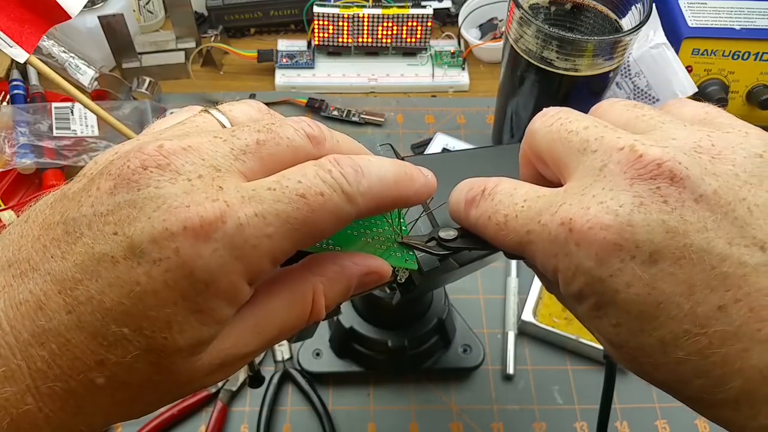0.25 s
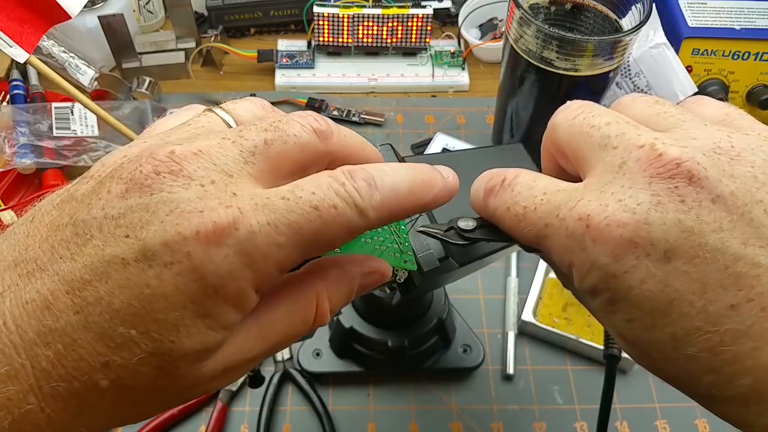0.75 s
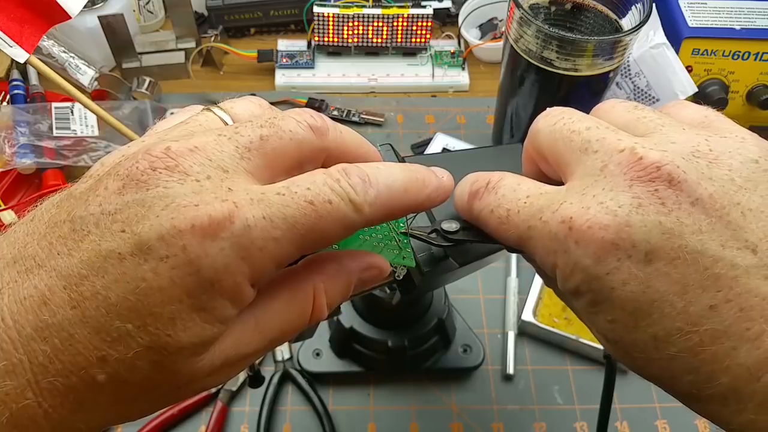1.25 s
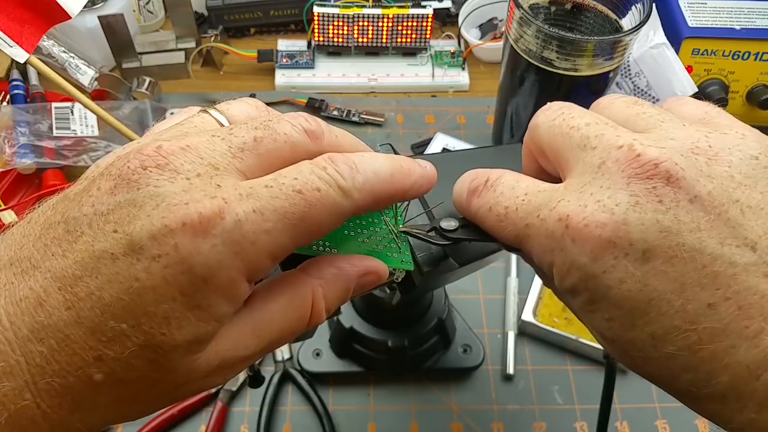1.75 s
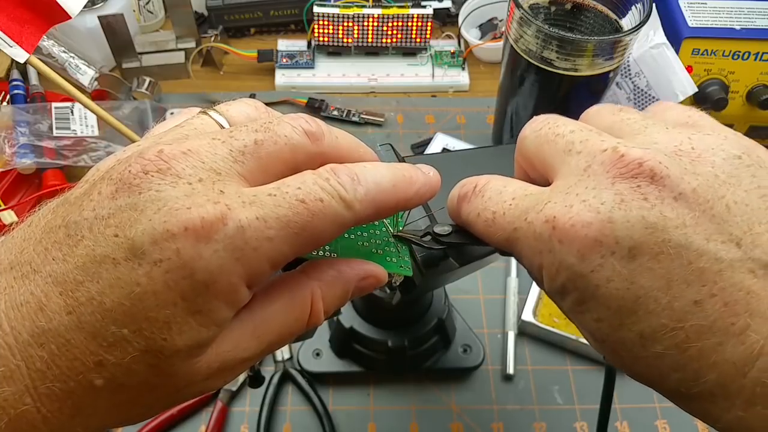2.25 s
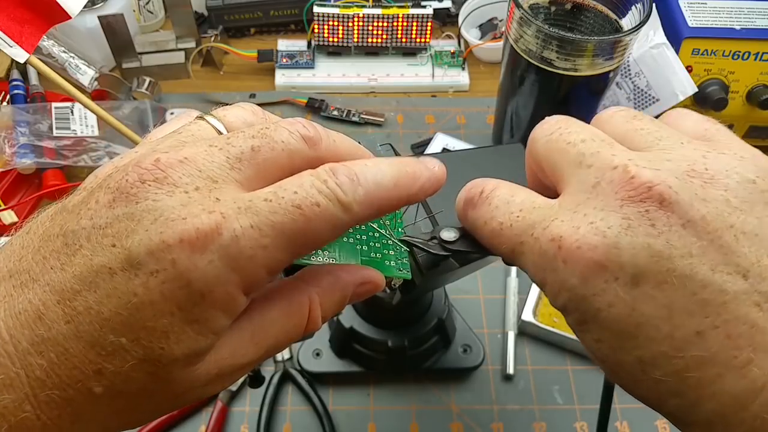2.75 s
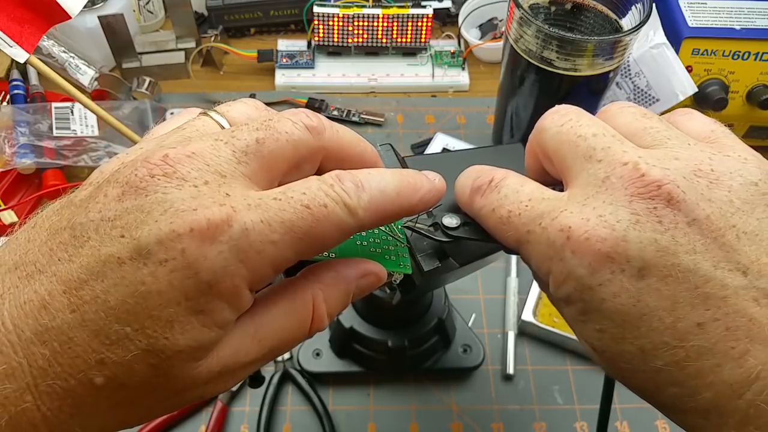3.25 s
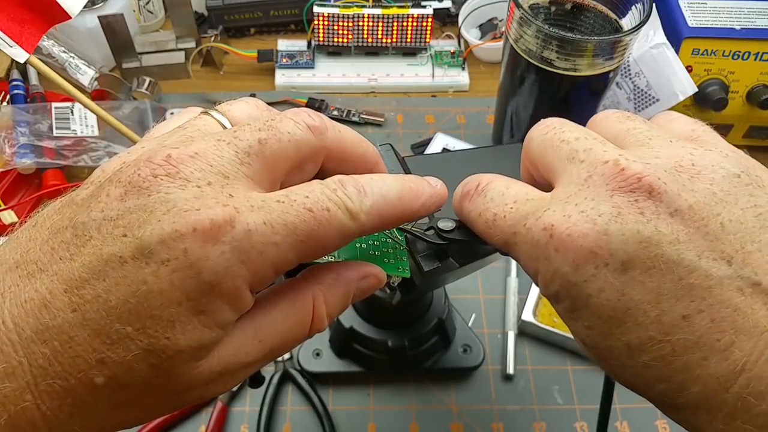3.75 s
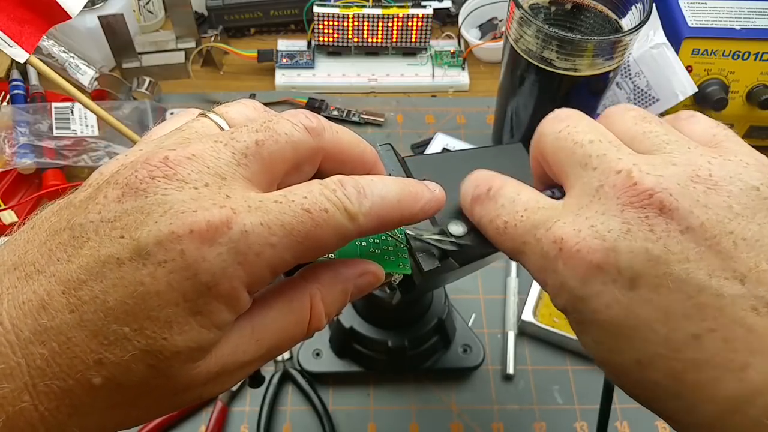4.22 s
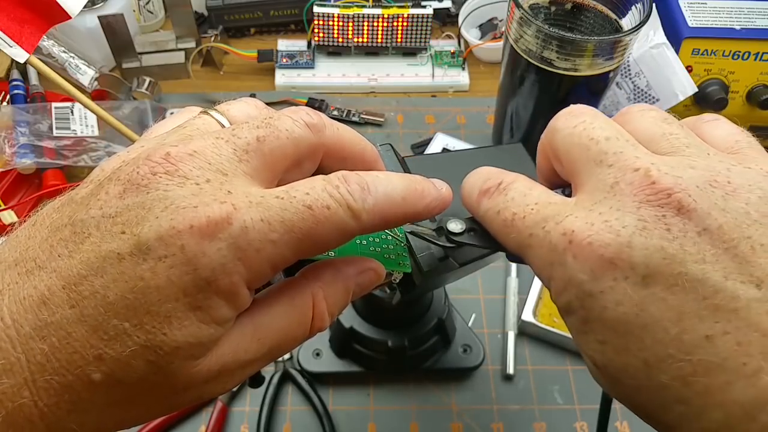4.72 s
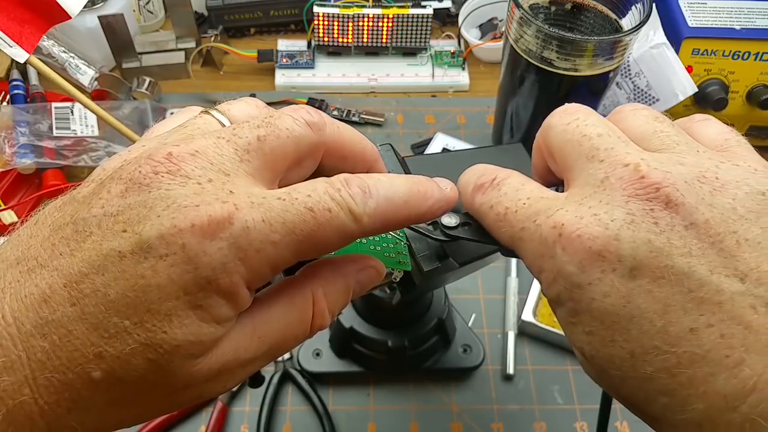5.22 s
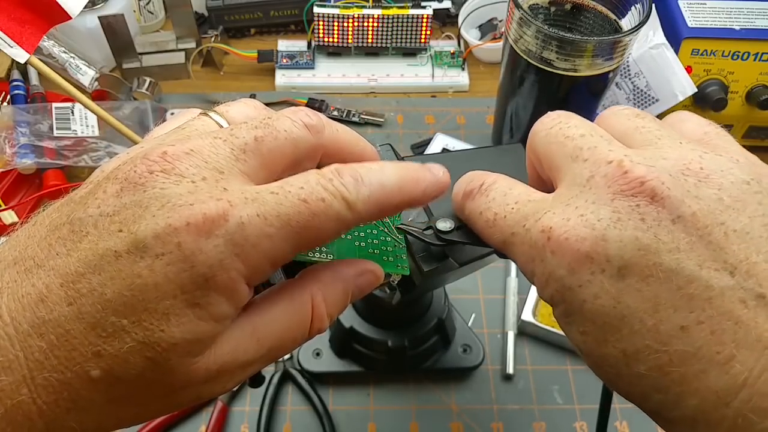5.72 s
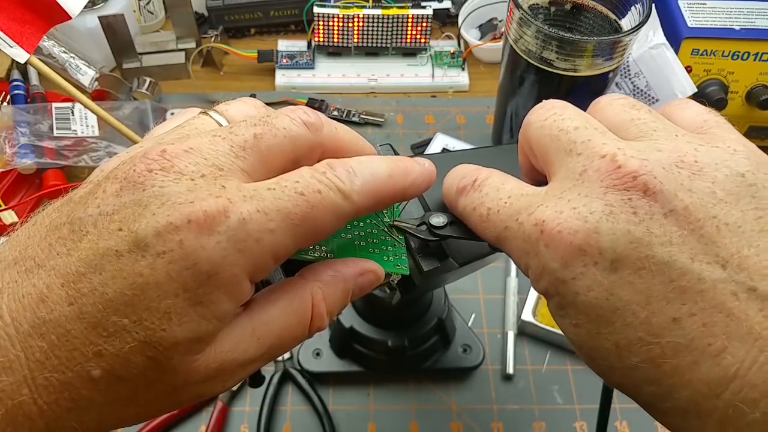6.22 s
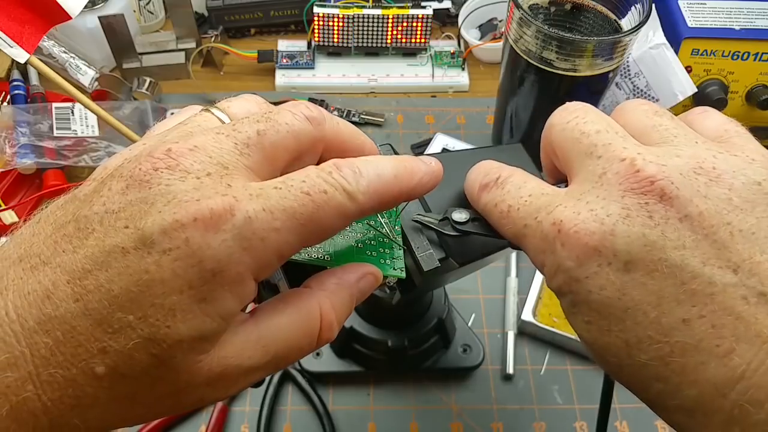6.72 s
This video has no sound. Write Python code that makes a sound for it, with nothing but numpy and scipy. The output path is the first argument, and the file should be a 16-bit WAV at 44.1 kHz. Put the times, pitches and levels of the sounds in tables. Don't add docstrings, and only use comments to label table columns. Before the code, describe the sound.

Very close stereo microphones at a workbench in a small room. Steel cutter jaws tick and drag on wire leads, tapping a circuit board held in a vise. Five sharp, bright snips stand far above everything else, each with a metallic clatter, a brief board ring and a short room answer. A longer stretch of light fiddling separates the third and fourth. Low ventilation rumble and faint hiss continue throughout.

```python
import sys
import numpy as np
from scipy import signal
from scipy.fft import rfft, irfft, next_fast_len
from scipy.io import wavfile
from scipy.ndimage import uniform_filter1d, map_coordinates

SR = 44100
rng = np.random.default_rng(int(sys.argv[2]) if len(sys.argv) > 2 else 0)


def gain_from_db(level_db):
    decades = np.asarray(level_db, float) / 20
    return 10 ** decades


def log_audio(samples):
    frames = np.atleast_2d(samples).T
    limited = np.clip(frames, -1, 1)
    pcm = np.round(limited * 32767).astype(np.int16)
    wavfile.write(sys.argv[1], SR, pcm)


N = 307818
HISS_TOP_HZ = 15850


def unit(x):
    return x / np.sqrt(np.mean(x ** 2) + 1e-20)


def along(points, hz):
    f, v = np.transpose(points)
    return np.interp(np.log(hz + 1), np.log(f + 1), v)


def tinted(x, gain):
    m = next_fast_len(x.shape[-1] + 4096)
    spectrum = rfft(x, m) * gain(np.fft.rfftfreq(m, 1 / SR))
    return irfft(spectrum, m)[..., :x.shape[-1]]


def bump(hz, centre, width):
    return 1 / (1 + ((hz - centre) / width) ** 2)


def sides(pan_db):
    return gain_from_db(np.array([[.5], [-.5]]) * pan_db)


def add(out, s, sound):
    at = round(s * SR)
    out[:, at:at + sound.shape[-1]] += sound


def ring(modes, t, scatter_db, rise=0.000076):
    total = 0
    for hz, db, t60 in modes:
        strength_db = db + scatter_db * rng.normal()
        total = total + gain_from_db(strength_db - 60 * t / t60) * np.sin(2 * np.pi * hz * t)
    return total * (1 - np.exp(-t / rise))


def pair(size, alike):
    def mid_and_side(hz):
        turn = np.arccos(np.clip(along(alike, hz), -1, 1)) / 2
        return np.array([np.cos(turn), np.sin(turn)])
    mid, side = tinted(rng.standard_normal((2, size)), mid_and_side)
    return np.array([mid + side, mid - side])


def patchy(x, depth_db, size, bins, frames):
    z = signal.stft(x, nperseg=size)[2]
    patches = uniform_filter1d(rng.standard_normal(z.shape[1:]), bins, axis=0)
    patches = unit(uniform_filter1d(patches, frames, axis=1))
    return unit(signal.istft(z * gain_from_db(depth_db * patches), nperseg=size)[1][:, :x.shape[-1]])


# pitch in Hz, half width in Hz, boost in dB.
DUCT_BOOMS = [(40, 9, 6.5), (102, 5, 3), (129, 2.2, 1.5), (143, 7, 3.5), (244, 7, 3), (456, 22, 2.5),
              (790, 20, 5)]
def duct_db(hz):
    return sum(db * bump(hz, centre, width) for centre, width, db in DUCT_BOOMS)


# time in seconds, level in dB.
VENT_LEVEL = [(0.0, -51), (0.21, -52), (0.52, -57), (0.58, -53), (0.6, -50), (0.91, -54), (1.05, -50),
              (1.11, -53), (4.78, -51.5), (4.92, -55), (4.96, -50.5), (5.27, -51.5), (6.9, -51.5),
              (6.98, -55.5)]
# pitch in Hz, level in dB per Hz.
VENT_COLOUR = [(11, -38.5), (18, -7.5), (38, -8.5), (59, -6), (99, 0), (151, -6), (174, -15.5),
               (200, -17.5), (238, -8.5), (269, -12.5), (327, -11.5), (564, -24), (626, -21.5), (1120, -41),
               (1200, -26), (1560, -60.5), (2640, -120)]
# pitch in Hz, likeness from 0 to 1.
VENT_LIKENESS = [(35, .993), (120, .98), (180, .75), (280, .8), (420, .52), (600, .42), (900, 0),
                 (15000, 0)]
def ventilation(now):
    rumble = unit(tinted(pair(N, VENT_LIKENESS), lambda hz: gain_from_db(along(VENT_COLOUR, hz) + duct_db(hz))))
    rumble = patchy(rumble, 1.5, 2048, 6, 5)
    sway = map_coordinates(rng.standard_normal(200), [now * 4])
    return gain_from_db(np.interp(now, *np.transpose(VENT_LEVEL)) + 0.3 * sway) * rumble


# pitch in Hz, level in dB per Hz.
HISS_COLOUR = [(410, -23.5), (700, -3.5), (841, -5.5), (1120, -4.5), (1300, -9.5), (1420, -4.5),
               (1710, -10.5), (2000, -8), (3740, -15.5), (4920, -8), (7890, -22.5), (15200, -18.5),
               (16000, -29)]
# pitch in Hz, width in Hz, dB over the hiss.
SUPPLY_WHINE = (11350, 200, 4)
def microphone_hiss():
    whine_hz, width_hz, whine_db = SUPPLY_WHINE
    def colour(hz):
        level_db = along(HISS_COLOUR, hz) + whine_db * bump(hz, whine_hz, width_hz) + duct_db(hz)
        return gain_from_db(level_db) * (hz < HISS_TOP_HZ)
    return gain_from_db(-65.5) * unit(tinted(rng.standard_normal((2, N)), colour))


# middle in seconds, level in dB, length in seconds.
GRIP_MOVES = [
    (0.715, -68.5, 0.074),
    (1.548, -75.5, 0.34),
    (2.414, -71, 0.04),
    (4.286, -79, 0.3),
    (5.702, -69, 0.18),
    (6.092, -68.5, 0.18),
]
def hands(now):
    moving = gain_from_db(-82)
    for s, db, length in GRIP_MOVES:
        moving = moving + gain_from_db(db) * np.exp(-((now - s) / length) ** 2)
    flutter = map_coordinates(rng.standard_normal(200), [now * 24])
    rustle = unit(tinted(pair(N, [(500, 0.45), (1500, 0.0029)]), lambda hz: bump(hz, 900, 600)))
    return moving * gain_from_db(2.5 * flutter) * rustle


# pitch in Hz, level in dB per Hz.
ECHO_COLOUR = [(290, -27.5), (500, -3), (651, -9), (1640, -7), (2040, 0), (2390, -3), (4970, -6),
               (14300, -13.5), (15800, -12), (16500, -38.5)]
# pitch in Hz, time to fall 60 dB in seconds.
ROOM_DECAY = [(500, 0.13), (2000, 0.14), (7000, .17), (14000, 0.14)]
def reverb(size):
    noise = pair(size, [(300, 0.8), (1400, 0.65), (3000, .05)])
    noise = tinted(noise, lambda hz: gain_from_db(along(ECHO_COLOUR, hz)) * (hz < HISS_TOP_HZ))
    noise = patchy(patchy(noise, 3, 512, 2, 7), 2.5, 128, 5, 3)
    hz, t, z = signal.stft(noise, SR, nperseg=128)
    fading = z * gain_from_db(-60 * t / along(ROOM_DECAY, hz)[:, None])
    return signal.istft(fading, SR, nperseg=128)[1][:, :size]


# pitch in Hz, boost in dB.
JAW_RINGS = [(2850, 3), (3200, 9), (3680, 2.5), (4350, 5), (4850, 7), (5500, 3.5), (7000, 6)]
def grate(t, centre_hz, top_db, rise, t60, pan_db):
    grit = rng.standard_normal((2, len(t))) * gain_from_db(4.9 * rng.standard_normal(len(t)))

    def shelf(hz):
        return 0.74 * hz ** 2 / (hz ** 2 + 1500 ** 2) / (1 + (hz / HISS_TOP_HZ) ** 20)

    def bright(hz):
        return 1 / (1 + (7000 / (hz + 1)) ** 6)

    def jaw_colour(hz):
        steel = gain_from_db(sum(db * bump(hz, mode_hz, 90) for mode_hz, db in JAW_RINGS) - 3.5)
        peak = np.exp(-np.log((hz + 1) / centre_hz) ** 2 / 0.036)
        return steel * (shelf(hz) * (1 - bright(hz)) + peak)

    hump = tinted(grit, jaw_colour)
    edge = gain_from_db(top_db + 1.5) * tinted(grit, lambda hz: shelf(hz) * bright(hz))
    edge_fade = gain_from_db(-60 * t / t60 * (1 / 0.55 - 1))
    burst = (hump + edge * edge_fade) / np.std(hump + edge)
    shape = gain_from_db(-60 * t / t60) * (1 - np.exp(-t / rise))
    return sides(pan_db) * burst * shape / shape.max() + gain_from_db(top_db / 2 - 9.0) * reverb(len(t))


# start in seconds, level in dB, centre pitch in Hz,
# top octave in dB, left over right in dB.
LEAD_TICKS = [(0.0364, -43.5, 4300, -2, 3), (0.1693, -37, 3680, -8, -11.5), (0.1967, -41, 3700, -2.5, 3),
              (0.2718, -50.5, 3470, -2, 3), (0.319, -48.5, 3400, -18, -3), (0.6666, -53, 3310, 8, -9),
              (1.0513, -46.5, 2820, -48, 0), (1.7833, -51.5, 5270, -9, 0), (2.192, -53, 2560, 1, 1),
              (2.5721, -53, 2660, -14, -4), (2.6194, -58, 2940, -4, 0.5), (2.8596, -39.5, 2710, -8, -1),
              (2.8812, -45, 2850, 10, -0.5), (3.062, -35.5, 4500, -5.5, 4), (4.2337, -49, 2518, -14, -2),
              (4.341, -42.5, 3180, 12, -2), (4.6313, -32.5, 3720, -11, -3), (4.704, -50, 4800, -7, 0),
              (4.7407, -49.5, 3700, -8, -1), (4.778, -48.5, 4760, -6.5, -1), (5.8329, -42.5, 2880, -30, 5),
              (6.1516, -30.5, 4750, -11.5, -4.5), (6.657, -51, 4800, -6, 1), (5.87, -54.5, 1900, -25, 0),
              (2.925, -56, 12500, 5, -2), (3.135, -52, 9500, 7, 0), (3.175, -59, 9500, 0, 0),
              (4.726, -52, 5000, -6.5, 0)]
# start in seconds, level in dB, centre pitch in Hz,
# top octave in dB, time to fall 60 dB in seconds.
LEAD_DRAGS = [(0.0392, -28.5, 3750, -8, 0.021), (0.287, -54, 3080, 2, .03),
              (3.0655, -32.5, 6000, -10, 0.029), (3.124, -52, 4240, -2, 0.077),
              (4.246, -52, 3000, -15, .03), (4.358, -44.5, 3300, -2, 0.027), (4.634, -32.5, 5350, -4, .04),
              (5.012, -51.5, 3120, -5, 0.057), (5.839, -43.5, 2880, -33.5, 0.042),
              (6.161, -38, 4700, -23, 0.035), (6.237, -43, 2620, -5, 0.1), (6.2462, -35, 5130, -1, 0.038)]
def scrapes():
    out, t = np.zeros((2, N + SR)), np.arange(SR // 6) / SR
    for s, db, centre_hz, top_db, pan_db in LEAD_TICKS:
        add(out, s, gain_from_db(db - 6) * grate(t, centre_hz, top_db, rise=.0003, t60=0.022, pan_db=pan_db))
    for s, db, centre_hz, top_db, t60 in LEAD_DRAGS:
        add(out, s, gain_from_db(db - 9.5) * grate(t, centre_hz, top_db, rise=0.12 * t60, t60=t60, pan_db=-6.0))
    return tinted(out[:, :N], lambda hz: 1 / (1 + (hz / HISS_TOP_HZ) ** 40))


# start in seconds, level in dB, pitch in Hz,
# time to fall 60 dB in seconds.
OFFCUT_PINGS = [(.11, -68, 14500, .04), (.583, -57, 5070, .14), (1.008, -61, 2880, .07),
                (1.051, -50, 2850, .05), (1.05, -53, 2450, .03), (1.051, -58, 4350, .03),
                (5.838, -56, 2850, .04), (6.319, -60, 2900, .03), (1.3, -59, 660, .3),
                (1.345, -60, 650, .2), (2.255, -63, 1300, .12), (2.72, -52, 10500, .12),
                (2.832, -48, 840, .12), (2.834, -68, 14800, .05), (2.911, -62, 5250, .08),
                (2.911, -69, 14800, .07), (3.885, -59, 7200, .05), (5.02, -57, 1360, .07),
                (5.70, -59, 14750, .1), (.712, -66, 5400, .06), (.73, -65, 5400, .05),
                (4.277, -58, 2880, .05), (4.244, -60, 1850, .1), (6.213, -53, 1330, .06),
                (6.249, -54, 10000, .04), (6.249, -41, 4800, .06)]
def pings():
    out, t = np.zeros((2, N + SR)), np.arange(SR // 6) / SR
    for s, db, hz, t60 in OFFCUT_PINGS:
        waver = gain_from_db(3 * unit(uniform_filter1d(rng.standard_normal(len(t)), 200)))
        tone = ring([(hz, db, t60), (hz + 45, db - 9, t60)], t, 0, rise=.003)
        add(out, s, sides(-1.5) * waver * tone)
    return out[:, :N]


# pitch in Hz, level in dB, time to fall 60 dB in seconds.
BOARD_HIGH_TONES = [(1837, 0, 0.02), (1960, -2, 0.025), (2190, -13, 0.03), (2530, -9, 0.016),
                    (2880, -6, 0.03), (4350, -15, 0.021)]
def touch(t, db, hz, upper_db):
    low = ring([(hz, 0, .034), (hz * .86, -5, .034), (hz, -8, .03)], t, 0.54, rise=0.00079)
    body = low + gain_from_db(upper_db - 0.5) * ring(BOARD_HIGH_TONES, t, 2.3, rise=0.00013)
    scuff = unit(tinted(pair(len(t), [(1500, 0.24), (3000, .2)]), lambda f: bump(f, 1600, 800)))
    direct = sides(-3.5) * (body + gain_from_db(-11.5 - 60 * t / 0.054) * scuff)
    return gain_from_db(db) * (direct + gain_from_db(-26.5) * reverb(len(t)))


# start in seconds, level in dB, pitch in Hz, higher tones in dB.
BOARD_TAPS = [(0.2438, -55.5, 1360, -0.5), (0.288, -59.5, 1370, -3), (0.32, -57.5, 1320, -5),
              (0.37, -61.5, 1400, 4), (1.0085, -57, 1180, -6), (1.0502, -40, 1390, -13),
              (1.938, -64, 1390, 1), (2.247, -57, 1450, -5), (2.4575, -55, 1382, -1.5),
              (2.4694, -54, 1333, 1.5), (2.525, -51.5, 1410, -3.5), (2.8596, -45.5, 1390, -6),
              (2.8877, -53, 1370, -1), (3.73, -51.5, 1440, -15.5), (4.111, -51, 1254, -13),
              (4.2325, -61, 1190, 9), (4.2785, -48.5, 1400, -14), (4.341, -35, 1415, -11.5),
              (4.3624, -48, 1230, -18), (4.7437, -57, 1240, -9), (5.016, -53, 1360, -21.5),
              (5.395, -58, 1150, -4), (5.5464, -53.5, 1406, -11), (5.585, -50, 1370, -12),
              (5.7339, -59, 1250, -19), (5.8356, -45, 1433, -9), (5.842, -44, 1400, -9),
              (6.0333, -55.5, 1240, -11.5), (6.3185, -53.5, 1424, -4), (6.639, -56.5, 1380, -4),
              (.667, -60, 950, 0), (.733, -59, 1250, -1), (1.173, -64, 1250, 2), (5.425, -61.5, 1310, -7.5),
              (5.786, -60, 1150, -15), (6.023, -63, 1210, -8), (6.206, -55, 1250, -1),
              (1.002, -63, 1400, -2), (1.288, -68, 1290, -15)]
def taps():
    out, t = np.zeros((2, N + SR)), np.arange(SR // 6) / SR
    for s, db, hz, upper_db in BOARD_TAPS:
        add(out, s, touch(t, db, hz, upper_db))
    return out[:, :N]


# pitch in Hz, level in dB, time to fall 60 dB in seconds.
VISE_TONES = [(200.8, -6.5, 0.015), (255.6, -2, 0.15), (331.6, -0.5, 0.17), (403, -0.5, 0.13),
              (453, 7, .07)]
def vise(t, scatter_db, **onset):
    return ring(VISE_TONES, t, scatter_db, **onset)


# start in seconds, level in dB.
VISE_THUDS = [(.3694, -58.5), (0.6357, -63), (1.051, -61), (2.391, -61), (2.4586, -50.5), (2.5256, -51),
              (2.5698, -54.5), (2.8588, -55.5), (3.7293, -61), (4.111, -58.5), (4.341, -47.5), (5.017, -61),
              (5.835, -58.5), (6.552, -55)]
def thuds():
    out, t = np.zeros((2, N + SR)), np.arange(SR // 6) / SR
    for s, db in VISE_THUDS:
        add(out, s, gain_from_db(db) * sides(-2.2) * vise(t, 2.8, rise=0.0015))
    return out[:, :N]


def snap_pulse(t, lead):
    u = (t - lead - np.array([[0], [.00005]])) / .000032
    pull = np.array([[.5], [.85]]) * np.exp(-((u + 2.8) / 1.9) ** 2)
    push = 1.35 * np.exp(-u ** 2)
    recoil = .35 * np.exp(-((u - 2.6) / 1.5) ** 2)
    return tinted(push - pull - recoil, lambda hz: hz ** 2 / (hz ** 2 + 1100 ** 2))


# pitch in Hz, level in dB per Hz.
CLATTER_COLOUR = [(290, -41), (500, -18), (834, -16), (1240, -12), (1650, -8), (1980, -0.5), (2600, -5),
                  (3600, -6), (5040, -5.5), (5510, -5.5), (7270, -2), (9060, -4), (12900, -6.5),
                  (15600, -7.5), (16600, -26)]
def jaw_clatter(after, peaks, tilt_db):
    def colour(hz):
        sings = sum((12 + db) * 0.6 * bump(hz, mode_hz, width / 2) for mode_hz, width, db in peaks)
        return gain_from_db(along(CLATTER_COLOUR, hz) + sings + tilt_db * np.log2((hz + 1) / 4000))
    size = len(after)
    knocks = gain_from_db(4 * rng.standard_normal(size))
    noise = pair(size, [(1200, 0.85), (2200, 0.7), (3500, 0.4), (6000, 0.028)])
    noise = unit(tinted(noise * knocks, colour))
    t = np.arange(size) / SR
    fade = gain_from_db(-60 * t / 0.029) + 0.8 * gain_from_db(-60 * after / 0.006)
    return noise * fade * (1 - np.exp(-after / 0.00022))


# time in seconds, snap level in dB.
CUTS = [
    (.54081, -5.5),
    (1.48400, -8.5),
    (2.69238, -2),
    (5.63634, -8),
    (6.44942, -5.5),
]
# jaw clatter in dB, brightness in dB per octave, low board tone in dB,
# higher board tones in dB, left over right in dB.
CUT_AFTERMATH = [
    (-15, -1.5, -23, -29, -3),
    (-16.5, -0.7, -30.5, -33, -2.5),
    (-12, -2, -31, -27, 0),
    (-17, 0, -27, -29, -4),
    (-14.5, -1.6, -23.5, -25.5, -0.5),
]
# pitch in Hz, width in Hz, level in dB.
CUT_TONES = [
    [(2090, 97, -6), (4960, 420, -5.5), (5940, 470, -5.5), (7290, 310, -0.5), (7750, 190, -8),
     (8780, 190, -10), (9730, 250, -2), (10400, 140, -11), (11400, 170, -11), (12500, 380, -6.5),
     (14600, 430, -17), (15300, 200, -17)],
    [(2050, 170, -2.5), (3360, 270, -15), (5070, 350, -11), (5850, 220, 0), (6800, 250, -1),
     (7400, 230, -3), (9900, 260, 1), (10700, 540, -5), (11500, 140, -8), (12300, 190, -11.5),
     (14100, 210, -4), (15200, 420, -3)],
    [(1945, 123, 4.5), (3280, 100, -14), (3750, 95, -17), (4730, 450, -3), (5870, 210, -7.5),
     (7030, 250, -7.5), (7500, 440, -15), (8020, 340, -14), (9800, 340, -4.5), (11600, 400, -8),
     (14500, 220, -10), (14960, 160, -16)],
    [(1810, 260, -3), (3200, 330, 2), (4580, 240, -4), (5080, 200, -6), (6350, 550, -3), (7400, 250, 1),
     (9440, 170, -18), (10300, 280, -10.5), (12100, 240, -12.5), (12800, 190, -13), (14000, 240, -13),
     (15000, 350, -12)],
    [(3080, 640, -5.5), (5100, 230, 3.5), (5430, 220, -8), (6370, 170, -4.5), (6830, 200, -6),
     (9400, 380, -14.5), (10210, 310, -5), (10850, 450, -11.5), (12000, 210, -9), (13600, 230, -5),
     (14360, 210, -10), (14900, 180, -8)],
]
# pitch in Hz, level in dB, time to fall 60 dB in seconds.
ARM_THUMPS = [
    (350, -34.5, .03),
    (290, -33.5, 0.034),
    (451, -35.5, 0.027),
    (284, -36.5, .04),
    (434, -37.5, 0.066),
]
# pitch in Hz, level in dB, time to fall 60 dB in seconds.
BOARD_LOW_TONES = [(1400, -1, 0.045), (1250, -14, 0.048), (2017, -11, .07), (1020, -11, .035)]
# pitch in Hz, left over right in dB.
HAND_SHADE = [(1000, 1.5), (2500, -0.5), (4500, 1), (7500, -1.5), (13000, -0.2)]
def snips():
    out, t = np.zeros((2, N + SR)), np.arange(SR // 3) / SR
    lead = .0005
    after = np.maximum(t - lead - .0001, 0)
    cuts = zip(CUTS, CUT_AFTERMATH, CUT_TONES, ARM_THUMPS)
    for (s, snap_db), (clatter_db, tilt_db, low_db, board_db, pan_db), peaks, thump in cuts:
        modes = [(hz, db + 20 * np.log10(width / 300), 3.1 * np.log(1000) / np.pi / width)
                 for hz, width, db in peaks]
        clatter = gain_from_db(clatter_db) * jaw_clatter(after, peaks, tilt_db)
        board = gain_from_db(low_db) * ring(BOARD_LOW_TONES, after, 1) + gain_from_db(board_db + 3.5) * ring(modes, after, 0)
        arm = ring([thump], after, 0, rise=0.00065)
        thud = gain_from_db(clatter_db - 32.5) * vise(after, 0)
        echo = gain_from_db(clatter_db - 15.5) * reverb(len(t)) * (1 - np.exp(-after / 0.0028))
        shaded = tinted(clatter + board + arm + thud,
                        lambda hz: gain_from_db(np.outer([.5, -.5], along(HAND_SHADE, hz))))
        add(out, s - lead, gain_from_db(snap_db) * snap_pulse(t, lead) + sides(pan_db) * shaded + echo)
    return out[:, :N]


# delay in seconds, level in dB, pitch in Hz.
JAW_OPENINGS = [
    (0.093, -53.5, 1250),
    (.1, -79, 1260),
    (0.103, -49.5, 1290),
    (.1168, -52, 1380),
    (0.12, -57, 1230),
]
def openings():
    out, t = np.zeros((2, N + SR)), np.arange(SR // 6) / SR
    for (s, _), (delay, db, hz) in zip(CUTS, JAW_OPENINGS):
        add(out, s + delay, touch(t, db, hz, upper_db=-9))
    return out[:, :N]


def scene():
    now = np.arange(N) / SR
    background = ventilation(now) + microphone_hiss() + hands(now)
    return background + scrapes() + pings() + taps() + thuds() + snips() + openings()


def low_pass(x):
    return signal.sosfilt(signal.butter(12, 17150, fs=SR, output="sos"), x)


def record(dry):
    limited = tinted(dry, lambda hz: 1 / (1 + (hz / 16700) ** 90)) - .0005
    return low_pass(limited)


dry = scene()
out = record(dry)
log_audio(out)
```